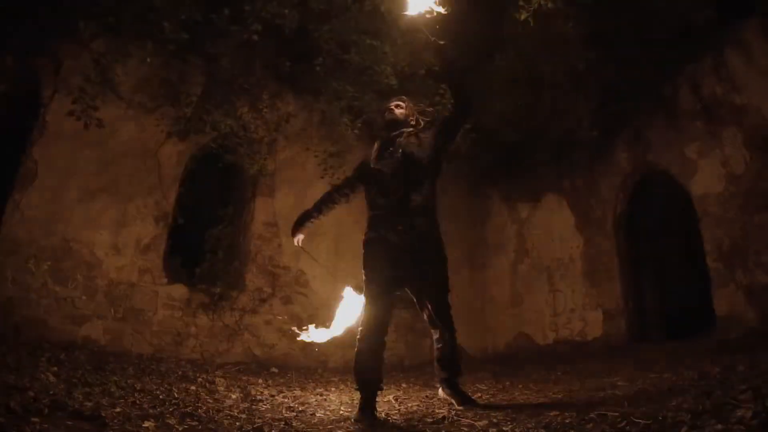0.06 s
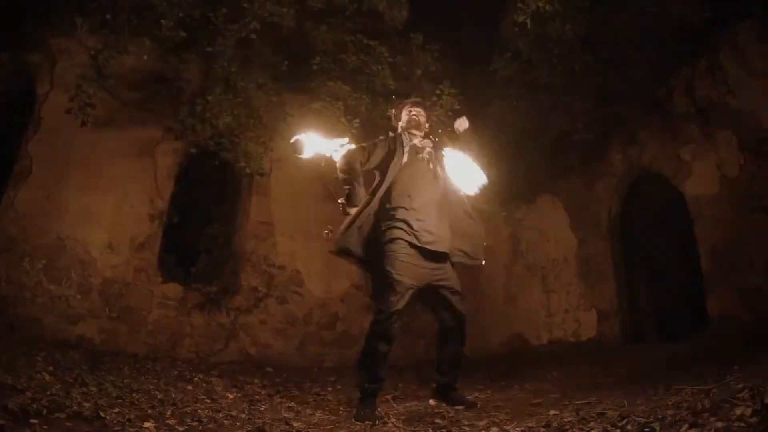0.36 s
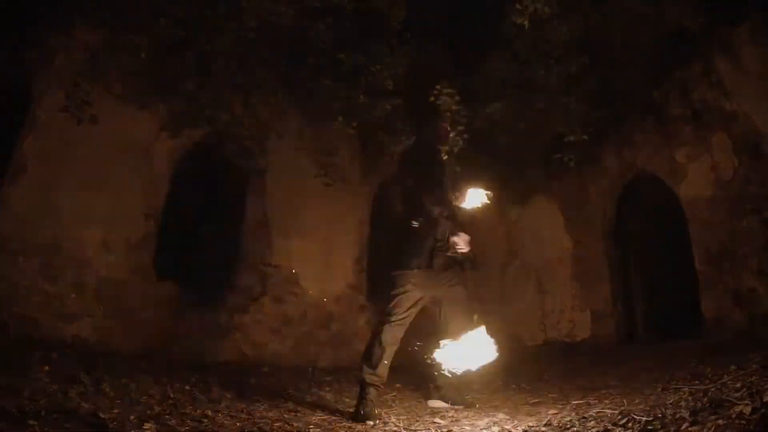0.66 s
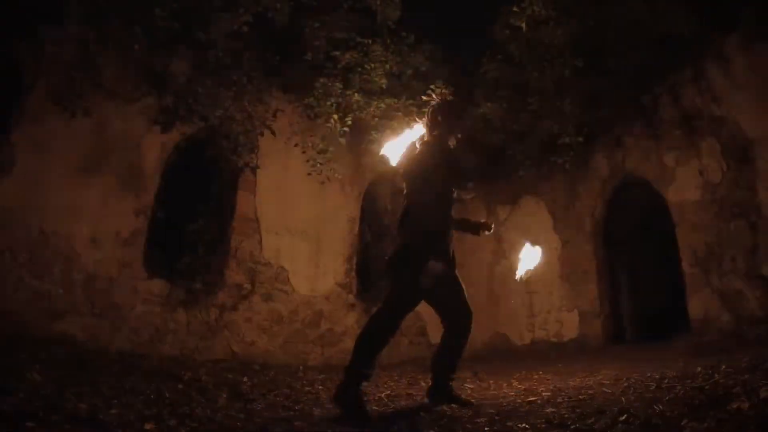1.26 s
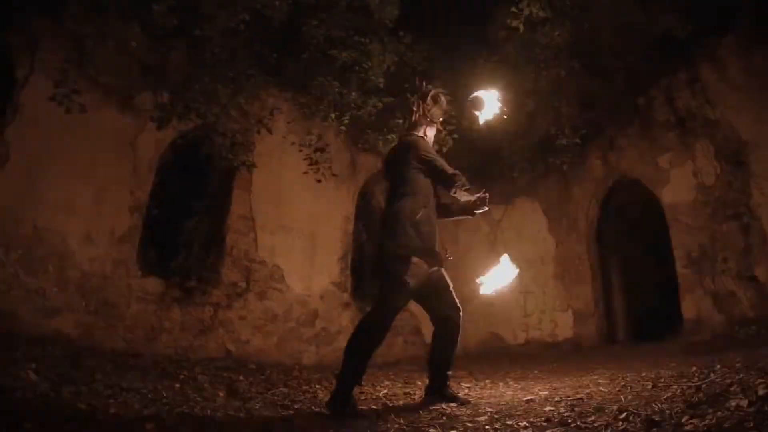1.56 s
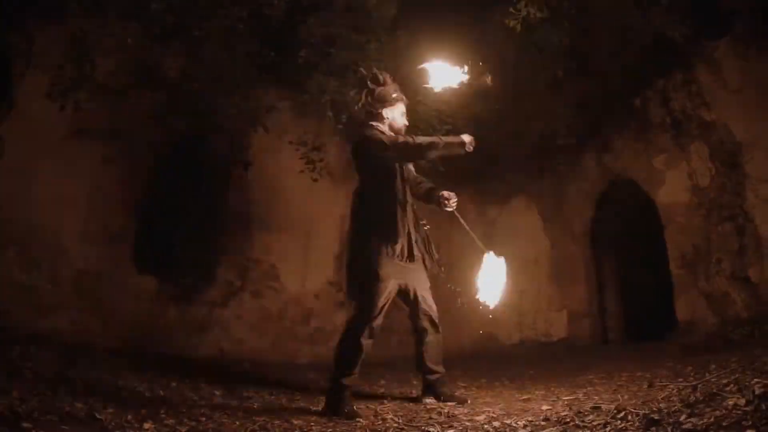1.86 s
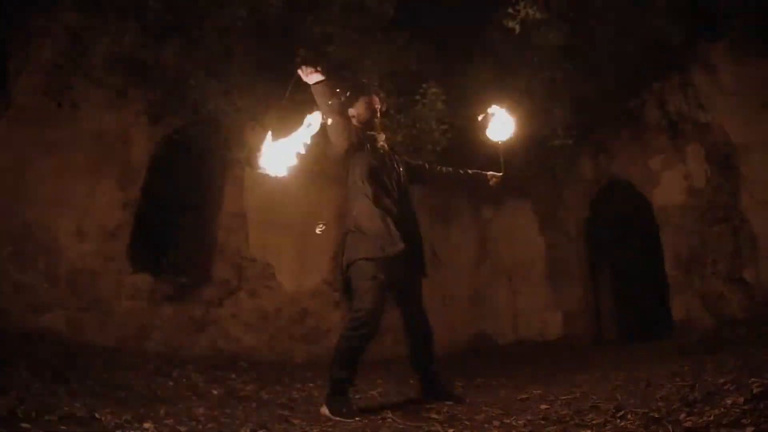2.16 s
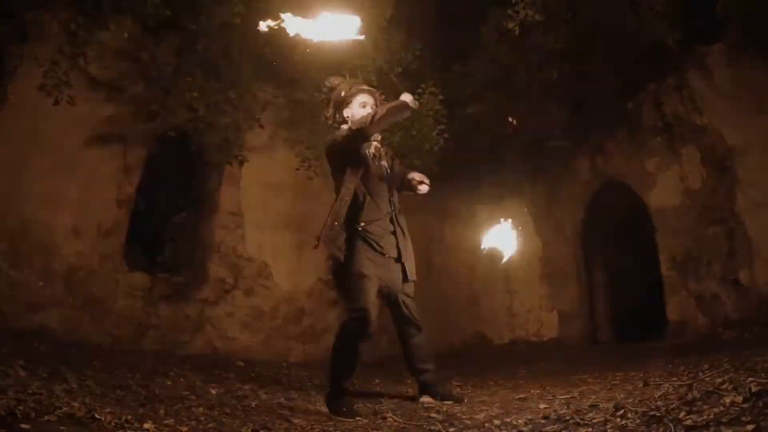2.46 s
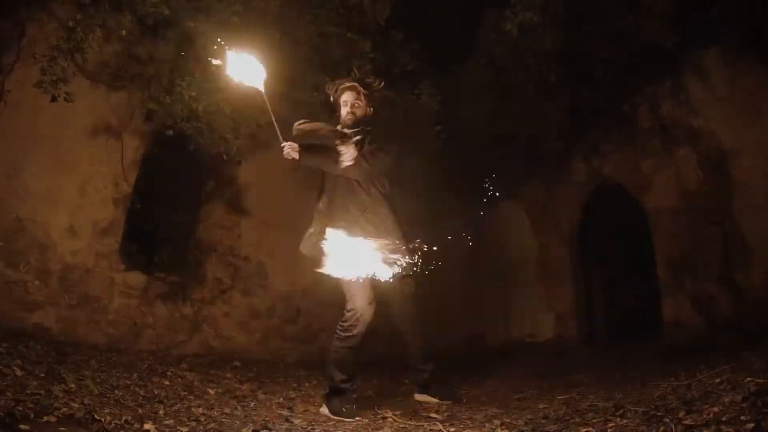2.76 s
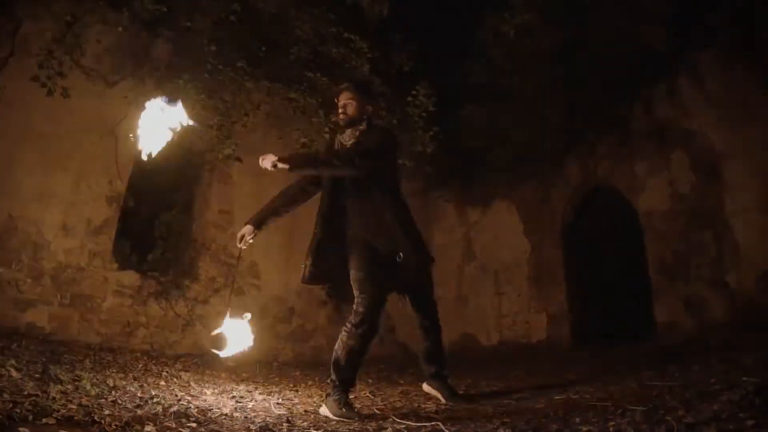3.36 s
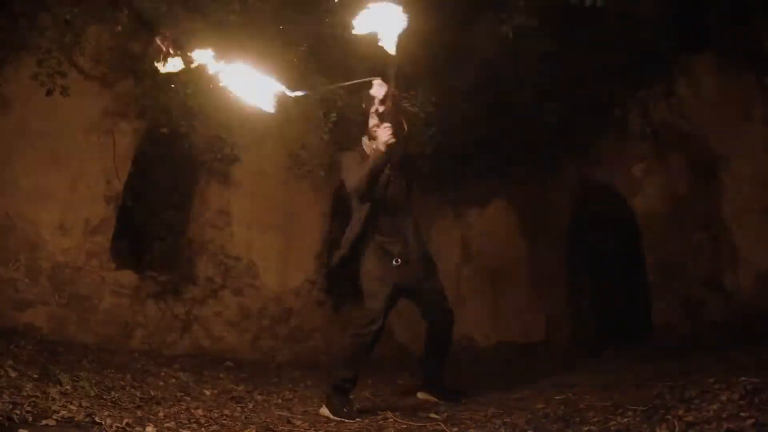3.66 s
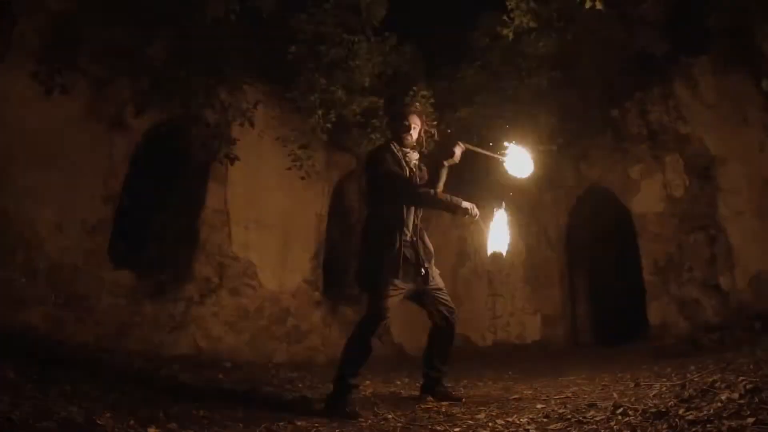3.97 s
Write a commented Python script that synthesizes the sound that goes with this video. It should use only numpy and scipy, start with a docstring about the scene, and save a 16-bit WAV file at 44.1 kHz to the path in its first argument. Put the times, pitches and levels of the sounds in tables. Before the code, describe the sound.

Swung flames roar and rumble in swelling whooshes, hissing and crackling on each fast pass.

```python
"""Fire poi at night

Two burning poi swing in circles in front of an old wall among trees. Air tearing at the flames makes
a deep, fluttering rumble and a roar; a hiss with fine crackle swells on each fast swing. The chains
click twice, the second time faintly. Wall, ground and trees throw a little of the clicks and crackle
back to a closely spaced pair of microphones."""
import sys
import numpy as np
from scipy import signal
from scipy.fft import rfft, irfft
from scipy.io import wavfile
from scipy.ndimage import uniform_filter1d, minimum_filter1d

SR = 44100
rng = np.random.default_rng(int(sys.argv[2]) if len(sys.argv) > 2 else 0)


def digitize_waveform(pressure):
    """Quantize a signal to 16-bit integers and store it at the path in sys.argv[1].

    Rows of a 2-D input are taken as channels; values are limited to [-1, 1].
    """
    field = np.atleast_2d(pressure).T
    bounded = np.clip(field, -1, 1)
    quanta = np.round(bounded * 32767).astype(np.int16)
    wavfile.write(sys.argv[1], SR, quanta)


N = 176400

# The flames' base tone. Each row: frequency in Hz, relative level in dB.
FLAME_TONE = [(15, -58), (26, -31), (37, -1), (47, -6.5), (60, -2), (75, -4), (100, 0), (135, 2.5),
              (190, -3.5), (250, -4), (340, -8.5), (450, -10.5), (700, -17.5), (1000, -24), (1500, -31.5),
              (2500, -38), (4000, -42.5), (6000, -47), (8000, -46.5), (11000, -46.5), (13000, -53),
              (15800, -62)]
# Stereo width. Each row: frequency in Hz, likeness of the two channels from 0 to 1.
LIKENESS = [(50, 0.78), (130, 0.92), (600, 0.96), (1400, 0.94), (3500, 0.52), (7000, 0.74), (13000, 0.7)]


def flames():
    """Air tears at the flames: dark turbulent noise that swells, flutters and moves with the swings."""
    hz = np.fft.rfftfreq(N, 1 / SR)
    common, apart = rfft(rng.standard_normal((2, N))) * amp(over_hz(FLAME_TONE, hz))
    likeness = over_hz(LIKENESS, hz)
    mid, side = np.sqrt(1 + likeness) * common, np.sqrt(1 - likeness) * apart
    noise = unit(irfft([mid + side, mid - side], N))
    frames = dict(fs=SR, nperseg=768, noverlap=640)
    f, t, spectrum = signal.stft(noise, **frames)
    spectrum = spectrum * amp(swing_db(f, t) + flutter_db(f, t)) * circling(f, t)
    return signal.istft(spectrum, **frames)[1][:, :N]


# Fader ride for the deepest bass. Each row: time in seconds, relative level in dB.
SUB_RIDE = [(0, -23.0), (0.19, -32), (0.38, -20), (0.52, -29.5), (0.78, -17), (1.17, -28), (1.5, -24),
            (1.57, -25.5), (1.78, -27.5), (2.03, -20.0), (2.32, -34.5), (2.44, -21), (2.98, -24.5),
            (3.14, -28.0), (3.5, -23.5), (3.6, -32), (3.92, -17), (4, -25)]
# Ride for the body of the fire. Each row: time in seconds, rumble and roar in relative dB.
BODY_RIDE = [(0, -16, -26.5), (0.19, -19, -28), (0.5, -14.5, -17.5), (0.68, -14.5, -21.5),
             (0.83, -14.5, -12.5), (1.0, -18.5, -24.5), (1.27, -17.0, -23.5), (1.48, -18.5, -23.5),
             (1.55, -10, -22.5), (1.68, -13.5, -19), (1.92, -14, -17), (2.1, -16.5, -20),
             (2.27, -30.5, -32.5), (2.36, -29.0, -31), (2.44, -15, -21), (2.55, -17, -17.5),
             (2.63, -14, -12.5), (2.74, -10.5, -20.5), (2.86, -8.5, -14.5), (2.91, -9.5, -22),
             (3.03, -12, -22.5), (3.15, -14.5, -24), (3.3, -15, -22.5), (3.41, -21.5, -22.5),
             (3.53, -8.5, -22.5), (3.66, -18.5, -22.5), (3.8, -18.5, -21), (3.95, -13.5, -19),
             (4, -22, -16.5)]
# Ride for the rush of air. Each row: time in seconds, hiss and top fizz in relative dB.
RUSH_RIDE = [(0, -44.5, -52.5), (0.08, -53.0, -57), (0.15, -48, -46), (0.21, -52, -56),
             (0.45, -38.5, -41.0), (0.63, -43.0, -44.5), (0.72, -41.5, -40.5), (0.82, -39, -39),
             (0.9, -42, -53), (0.99, -53, -52.5), (1.12, -48.5, -52.0), (1.19, -43.0, -48.5),
             (1.52, -49, -51.5), (1.61, -39, -41), (1.94, -37.5, -40), (2.03, -43.5, -47.5),
             (2.09, -43, -45.5), (2.27, -57.5, -58.5), (2.38, -53, -57.5), (2.56, -34.5, -37.5),
             (2.645, -34, -33), (2.675, -41.5, -44.0), (2.79, -37.5, -42.5), (2.85, -34, -37.5),
             (2.89, -41.5, -43), (2.92, -43, -42), (2.96, -53, -52), (3.07, -43.5, -47), (3.12, -49, -52.5),
             (3.28, -45.5, -45.5), (3.35, -49.5, -53.0), (3.4, -53.5, -49.0), (3.45, -48, -52.5),
             (3.52, -48, -46), (3.69, -41.5, -43.5), (3.78, -44, -44.5), (3.94, -38.5, -39.5),
             (4, -41, -43.5)]
BAND_HZ = KEEP_BANDS = (55, 122, 635, 3160, 7500)  # sub, rumble, roar, hiss, fizz


def swing_db(f, t):
    """Five bands rise and fall as the swings speed up and slow down, crossfaded over frequency."""
    rides = np.array(over_time(SUB_RIDE, t) + over_time(BODY_RIDE, t) + over_time(RUSH_RIDE, t))
    trim_db = np.array([11, 1.5, 8, 29, 31.5])
    crossfades = np.array([over_hz(list(zip(BAND_HZ, solo)), f) for solo in np.eye(len(BAND_HZ))])
    return crossfades.T @ (rides + trim_db[:, None])


# Depth of the fast flutter. Each row: frequency in Hz, rms depth in dB.
FLUTTER_DEPTH = [(60, 0.05), (250, 0.8), (1200, 0.4), (4000, 1.02), (12000, 1.4)]


def flutter_db(f, t, flutter_s=0.0076, patch_s=0.043, patch_db=1.24):
    """Turbulence shakes the whole flame quickly, while narrow patches of its spectrum waver slowly."""
    hop_s = t[1]
    flutter = unit(blur(rng.standard_normal(len(t)), flutter_s / hop_s))
    patches = blur(rng.standard_normal((80, len(t))), 1.3)  # neighbouring bands move together
    patches = unit(blur(patches, patch_s / hop_s, axis=1))
    band = (10 * np.log2(1 + f / 122)).astype(int)  # about ten to the octave above the rumble
    return over_hz(FLUTTER_DEPTH, f)[:, None] * flutter + patch_db * patches[band]


# The pan move. Each row: time in seconds, left minus right in dB before each band takes its share.
PAN_MOVE = [(0.02, 2.0), (0.23, 0.5), (0.28, 3), (0.57, -0.5), (0.69, 5), (0.89, -5), (1.14, -4),
            (1.22, -6.5), (2.35, 3.5), (2.42, -3.5), (2.66, 1.5), (3.38, 2.5), (3.64, 7), (3.98, 0)]
# How far each band follows the pan. Each row: frequency in Hz, share from 0 to 1.
PAN_FOLLOW = [(100, 0.29), (300, 0.83), (700, 0.71), (3500, 0.58), (8000, .25)]
# Steady lean between the microphones. Each row: frequency in Hz, left minus right in dB.
MIC_LEAN = [(60, .1), (150, .6), (600, .3), (1300, -.7), (4000, 1.1), (13000, 1.1)]
# How much sooner the left microphone hears the fire. Each row: time in seconds, lead in microseconds.
LEFT_LEAD = [(0, 29.2), (0.15, 25), (0.35, 55.1), (0.75, 20), (1.07, 38), (1.2, 18), (1.5, 37), (1.7, 47),
             (2.1, 37), (2.75, 43), (3.1, 36.0), (3.55, 28), (3.8, 48), (4, 48)]


def circling(f, t):
    """The flames move from side to side: left and right gains carry level and arrival-time gaps."""
    pan_db = over_hz(PAN_FOLLOW, f)[:, None] * over_time(PAN_MOVE, t)[0]
    pan_db += over_hz(MIC_LEAN, f)[:, None]
    lead_s = over_time(LEFT_LEAD, t)[0] / 1e6
    half_lead = np.exp(1j * np.pi * f[:, None] * lead_s)
    return np.array([amp(pan_db / 2) * half_lead, amp(-pan_db / 2) / half_lead])


def crackle(pops_per_s=400, centre_hz=3500, decay_s=0.0004):
    """Tiny pops of burning fuel at twelve pitches, swelling with the rush of air."""
    pops = (rng.random(N) < pops_per_s / SR) * amp(3 * np.minimum(rng.exponential(1, N), 4))
    pitch_index = rng.integers(0, 12, N)
    t = np.arange(256) / SR
    out = np.zeros(N)
    for k, hz in enumerate(centre_hz * np.geomspace(.5, 2, 12)):
        ping = np.exp(-t / decay_s) * np.sin(2 * np.pi * hz * t)
        out += signal.oaconvolve(pops * (pitch_index == k), ping)[:N]
    hiss_db = over_time(RUSH_RIDE, np.arange(N) / SR)[0]
    return slightly_left(unit(out) * amp(hiss_db - 16))


# Chain cues. Each row: start in seconds, relative level in dB, pitch as a factor.
CHAIN_CUES = [(.5365, -16, 1), (2.4072, -40, 0.69)]
# The links meet three times in each click. Each row: delay in seconds, level offset in dB.
LINK_TOUCHES = [(0, -7), (.0013, 5.5), (.0045, -5)]
# The metal's ring at pitch 1. Each row: frequency in Hz, relative level in dB, seconds to fall 60 dB.
LINK_MODES = [(7000, -7.5, 0.0025), (8160, -4.5, 0.0048), (8500, -2, .004), (10300, 4, .003),
              (11400, -3, .003), (13050, -13, .004), (13650, 6, 0.0062), (14000, -3, .004)]


def chain(low_hz=6300, high_hz=15000, snap_s=0.0009):
    """Small metal links snap tight and ring for a few milliseconds."""
    out = np.zeros((2, N))
    t = np.arange(2048) / SR
    for start, click_db, pitch in CHAIN_CUES:
        bright = signal.butter(3, [pitch * low_hz, pitch * high_hz], "band", fs=SR, output="sos")
        for delay, touch_db in LINK_TOUCHES:
            ring = sum(amp(db) * decay(t, t60) * np.sin(2 * np.pi * (pitch * hz * t + rng.random()))
                       for hz, db, t60 in LINK_MODES)
            snap = rng.standard_normal(len(t)) * np.exp(-t / snap_s)
            touch = amp(click_db + touch_db) * signal.sosfilt(bright, ring + snap)
            add(out, start + delay, slightly_left(touch))
    return out


def echoes(sound, slap_s=0.019, slap_db=-17, scatter_db=-11, predelay_s=0.003):
    """One slap off the wall, and a short scattered tail from ground and trees."""
    t = np.arange(SR // 2) / SR
    taps = rng.standard_normal((2, len(t))) * (rng.random((2, len(t))) < .1)
    taps *= (t > predelay_s) * decay(t, t60=0.25)
    taps = amp(scatter_db) * taps / np.linalg.norm(taps[0])
    taps[:, round(slap_s * SR)] += amp(slap_db)
    return signal.fftconvolve(sound, taps, axes=1)[:, :N]


def night_bed(level_db=-58):
    """A faint, steady white hiss."""
    return amp(level_db) * rng.standard_normal((2, N))


def amp(db):
    """Decibels to gain."""
    return 10 ** (np.asarray(db) / 20)


def unit(x):
    """Scales to an rms of one."""
    return x / np.sqrt(np.mean(abs(x) ** 2) + 1e-20)


def decay(t, t60):
    """Falls 60 dB in t60 seconds."""
    return np.exp(-np.log(1000) * t / t60)


def over_hz(points, hz):
    """Reads a table on a log-frequency axis."""
    f, value = np.transpose(points)
    return np.interp(np.log(hz + 1), np.log(f + 1), value)


def over_time(table, t):
    """Reads every column of a curve at the times t."""
    times, *columns = np.transpose(table)
    return [np.interp(t, times, column) for column in columns]


def blur(x, width, axis=0):
    """Smooths along one axis over about width steps."""
    x = np.swapaxes(x, axis, -1)
    n = x.shape[-1]
    lowpass = np.exp(-(2 * np.fft.rfftfreq(n) * width) ** 2)
    return np.swapaxes(irfft(rfft(x) * lowpass, n), axis, -1)


def slightly_left(mono):
    """Stereo with the right channel two samples late."""
    return np.array([mono, np.roll(mono, 2)])


def add(mix, start_s, sound):
    """Lays a stereo sound into the mix."""
    part = mix[:, round(start_s * SR):][:, :sound.shape[1]]
    part += sound[:, :part.shape[1]]


def scene():
    """Dry flames up front, clicks and crackle with their echoes, the night underneath."""
    transients = chain() + crackle()
    return flames() + transients + echoes(transients) + night_bed()


def record(dry, ceiling=1, cutoff_hz=15900):
    """A fast limiter holds any peak under the ceiling; a steep low-pass trims the very top."""
    gain = np.minimum(1, ceiling / (abs(dry).max(0) + 1e-9))
    gain = uniform_filter1d(minimum_filter1d(gain, size=201), size=201)
    lowpass = signal.firwin(511, cutoff_hz, window=("kaiser", 9), fs=SR)
    return signal.oaconvolve(dry * gain, lowpass[None], "same")


dry = scene()
out = record(dry)
digitize_waveform(out)
```